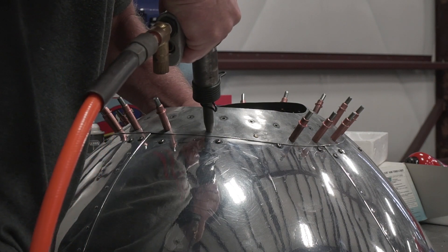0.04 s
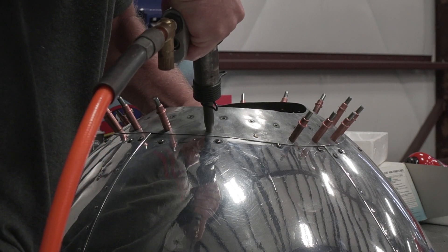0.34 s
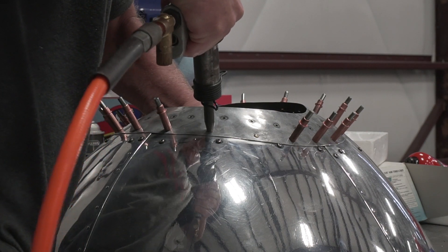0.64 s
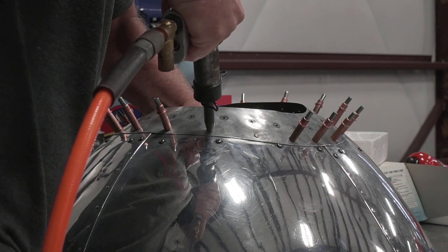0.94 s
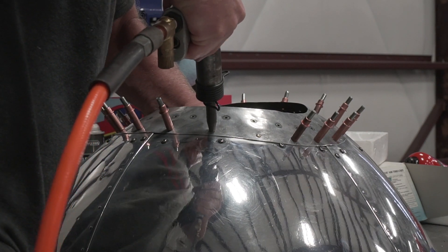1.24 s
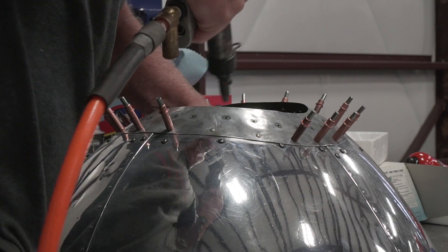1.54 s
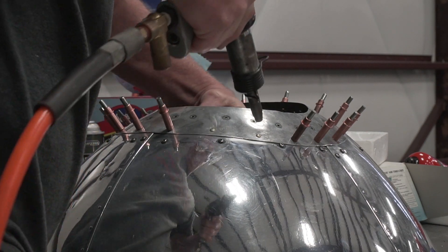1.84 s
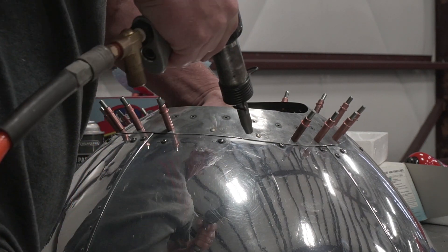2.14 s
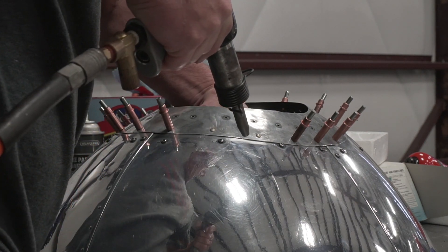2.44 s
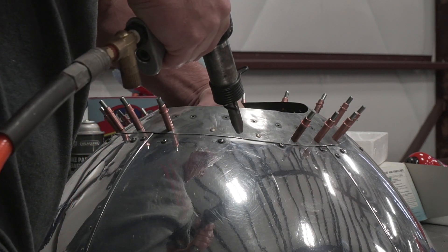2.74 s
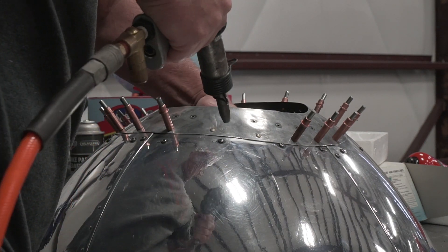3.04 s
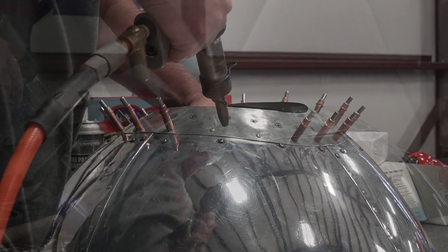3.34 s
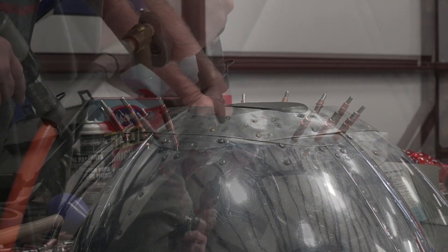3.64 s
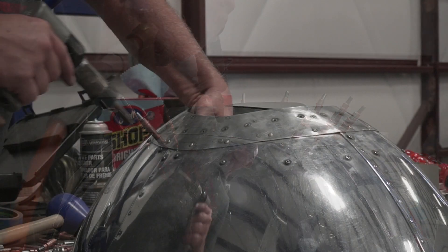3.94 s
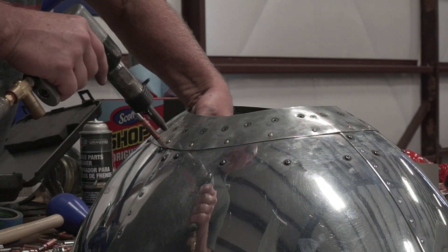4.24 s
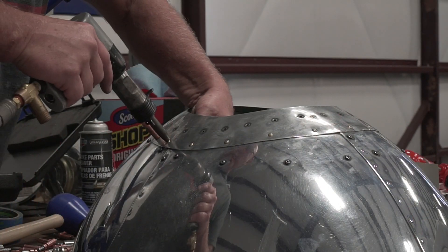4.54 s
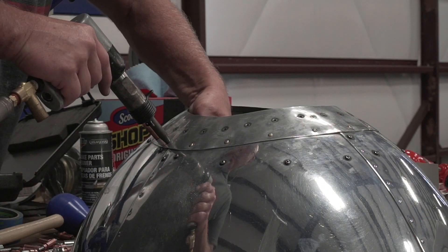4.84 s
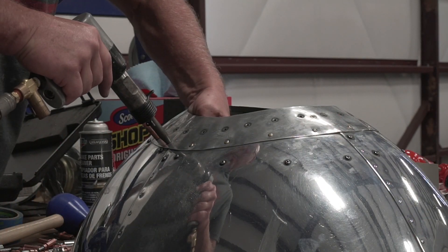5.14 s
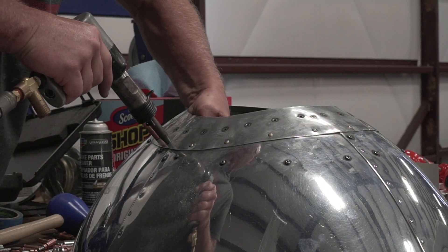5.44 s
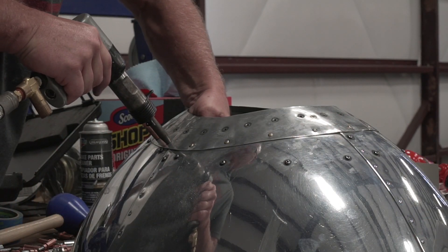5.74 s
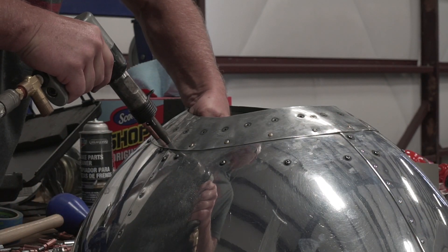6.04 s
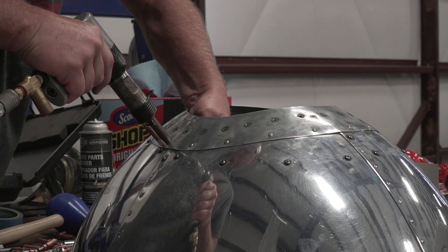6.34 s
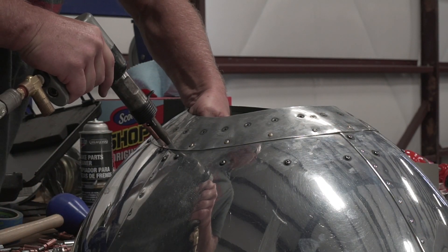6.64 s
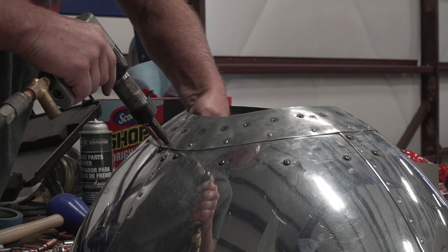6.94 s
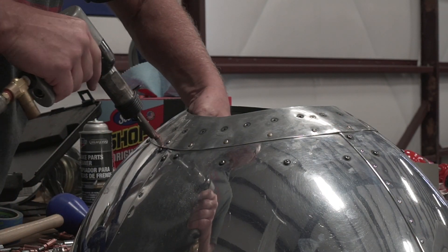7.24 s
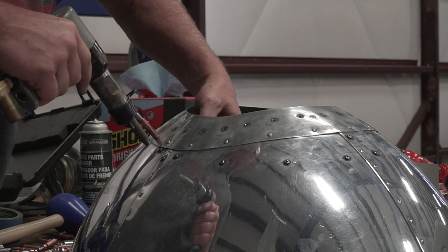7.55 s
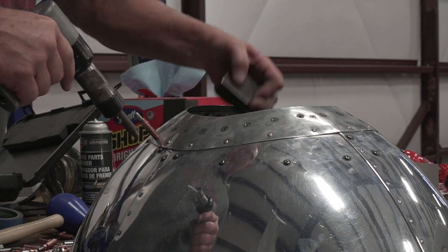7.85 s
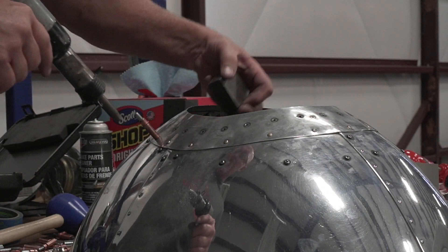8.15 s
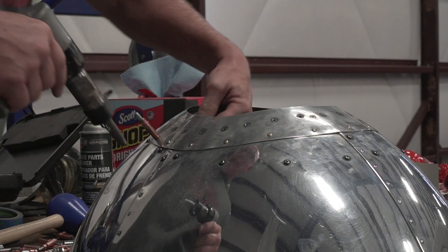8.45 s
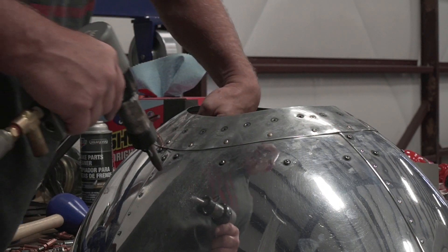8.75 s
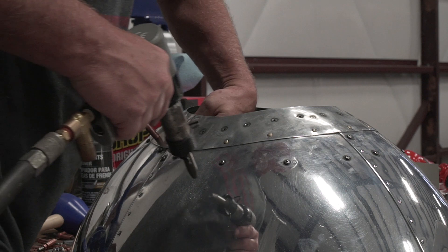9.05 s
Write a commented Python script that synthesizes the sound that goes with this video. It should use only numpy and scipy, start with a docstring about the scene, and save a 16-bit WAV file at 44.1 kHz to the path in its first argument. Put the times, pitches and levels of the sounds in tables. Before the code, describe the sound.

Rapid bursts of air-powered riveting ring on sheet metal in a reverberant workshop, separated by a pause with soft metallic knocks.

```python
"""A pneumatic rivet gun drives two rivets into a hollow sheet-metal shell in a large, hard-walled
workshop. Each piston blow is an impulse that cracks through the steel tool and excites the shell's
modes; the faster the piston runs, the harder it strikes. The trigger puffs air, and between rivets the
tool and the bucking bar knock on the metal. Behind them lie a hiss and a motor hum that dies away.
A close mono microphone ducks and overloads at the hard blows."""
import sys
import numpy as np
from scipy import signal
from scipy.fft import rfft, irfft
from scipy.io import wavfile
from scipy.ndimage import minimum_filter1d

SR = 44100
rng = np.random.default_rng(int(sys.argv[2]) if len(sys.argv) > 2 else 0)


def materialize(psi):
    """Save the field psi as 16-bit PCM at rate SR to the path in sys.argv[1].

    A 1-D psi becomes a single channel; in a 2-D psi each row is a channel.
    """
    bounded = np.clip(np.atleast_2d(psi).T, -1, 1)
    quanta = np.round(bounded * 32767).astype(np.int16)
    wavfile.write(sys.argv[1], SR, quanta)


N = 400428
LEAD = SR // 2  # samples before time zero, so that the room is already ringing


def amp(db):
    """Amplitude ratio of a level in decibels."""
    return 10 ** (np.asarray(db) / 20)


def unit_rms(x):
    """Normalisation of power to rms 1."""
    return x / np.sqrt(np.mean(x ** 2) + 1e-20)


def unit_energy(x):
    """Normalisation of a transient to the energy of 10 ms at rms 1."""
    return x * np.sqrt(SR / 100 / (np.sum(x ** 2) + 1e-20))


def read(points, hz, column=1):
    """Interpolation of a table column on a logarithmic frequency axis."""
    table = np.asarray(points, float)
    return np.interp(np.log(hz + 1), np.log(table[:, 0] + 1), table[:, column])


def add(mix, s, sound):
    """Superposition of a sound on the mix at time s."""
    part = mix[LEAD + round(s * SR):][:len(sound)]
    part += sound[:len(part)]


def coloured(x, spectrum, column=1, size=2048):
    """Minimum-phase filtering: the magnitude spectrum determines a causal response."""
    hz = abs(np.fft.fftfreq(size, 1 / SR))
    log_gain = np.log(amp(read(spectrum, hz, column)))
    taps = np.fft.ifft(np.exp(np.conj(signal.hilbert(log_gain)))).real
    return signal.fftconvolve(x, taps[:size // 2])[:len(x)]


def dying_noise(decay_times, count):
    """Modal overlap: dense modes merge into noise, each band decaying with its own T60."""
    hz, t, bands = signal.stft(rng.standard_normal(count), SR, nperseg=256)
    t60 = np.maximum(read(decay_times, hz), .01)[:, None]
    return signal.istft(bands * amp(-60 * t / t60), SR, nperseg=256)[1][:count]


def ring(t, hz, t60, db):
    """Free vibration of one damped mode; db sets its energy."""
    return amp(db - 60 * t / t60) / np.sqrt(t60) * np.sin(2 * np.pi * (hz * t + rng.random()))


def damped(t, modes):
    """Modal sum in which decay time is inversely proportional to bandwidth."""
    return unit_energy(sum(ring(t, hz, 2.2 / width, db) for hz, width, db in modes))


def scrape(t, decay_s):
    """Rough contact of metal on metal: exponentially decaying noise."""
    return rng.standard_normal(len(t)) * np.exp(-t / decay_s)


# Spectral density of the hiss: f/Hz, relative level/dB
HISS_SPECTRUM = [(12, -36), (20, -4), (27, -18), (60, -1.5), (123, -5.5), (150, 1), (177, -2.5),
                 (198, -4.5), (446, -10.5), (678, -7.5), (849, -10.5), (1220, -10), (5080, -15.5),
                 (8890, -27.5), (16000, -49.5)]


def hiss(level_db=-43, dip_s=3.7, dip_width_s=0.15, dip_db=-3, step_db=0.5):
    """Broadband noise whose level dips briefly and settles one small step higher, at level_db."""
    hz = np.fft.rfftfreq(N, 1 / SR)
    noise = irfft(rfft(rng.standard_normal(N)) * amp(read(HISS_SPECTRUM, hz)), N)
    u = (np.arange(N) / SR - dip_s) / dip_width_s
    envelope_db = level_db + dip_db * np.exp(-u ** 2 / 2) + step_db * (np.tanh(u) - 1) / 2
    return amp(envelope_db) * unit_rms(noise)


# Envelope of the motor hum: t/s, level/dB
HUM_ENVELOPE = [(0.0, -53), (0.1, -46), (1.13, -51), (1.37, -44), (1.92, -52), (2.29, -44), (3.18, -39.5),
                (3.69, -46.5), (3.9, -67)]
# Its harmonics: order, relative level/dB
HUM_HARMONICS = [(1, 4), (2, -14), (3, -22), (4, -12)]


def motor_hum(fundamental_hz=49.3, waver_rad=0.08, fade_db_per_s=80):
    """A harmonic series with slow random phase modulation, fading after the envelope's last point."""
    t, hz = np.arange(N) / SR, np.fft.rfftfreq(N, 1 / SR)
    hum = 0
    for order, db in HUM_HARMONICS:
        drift = unit_rms(irfft(rfft(rng.standard_normal(N)) * np.exp(-hz / 4), N))
        hum += amp(db) * np.sin(order * (2 * np.pi * fundamental_hz * t + waver_rad * drift))
    fade_db = fade_db_per_s * np.maximum(t - HUM_ENVELOPE[-1][0], 0)
    return amp(np.interp(t, *np.transpose(HUM_ENVELOPE)) - fade_db) * unit_rms(hum)


# Reverberation of the workshop: f/Hz, T60/s, level/dB
ROOM_BANDS = [(101, 2.3, -4.5), (183, 0.8, -14), (380, 0.71, -29), (1040, 0.69, -13), (2160, 1.26, -9.5),
              (4250, 1.73, -10), (7500, 1.63, -4.5), (11100, 0.95, -7), (15000, 0.59, -3.5)]


def workshop(x, build_s=0.0032, walls_s=0.033, walls_width_s=0.027, walls_db=1):
    """Reverberation: convolution with early reflections from the near walls and a diffuse tail."""
    t, hz = np.arange(2 * SR) / SR, np.fft.rfftfreq(2 * SR, 1 / SR)
    walls = amp(walls_db) * np.exp(-((t - walls_s) / walls_width_s) ** 2 / 2)
    tail = dying_noise(ROOM_BANDS, len(t)) * (1 + walls) * (1 - np.exp(-t / build_s))
    decay_energy = read(ROOM_BANDS, hz) * SR / (2 * np.log(1000))
    response = irfft(rfft(tail) * amp(read(ROOM_BANDS, hz, column=2)) / np.sqrt(decay_energy))
    return signal.fftconvolve(x, response)[:len(x)]


# Tool and bar set down on the shell: t/s, level/dB, thud f/Hz, hardness (0 to 1)
KNOCKS = [(2.204, -35.5, 225, 0.17), (2.354, -35, 233, 0.58), (2.39, -44, 400, 0.3), (3.188, -21, 427, .45),
          (3.201, -25.5, 420, 0.8), (3.52, -35, 298, 0.75), (3.839, -36, 330, .55), (4.619, -30, 427, 0.38),
          (4.733, -39.5, 375, 0.1), (4.917, -38.5, 350, 0.5), (6.883, -27.5, 450, .6),
          (7.238, -41, 377, .05), (7.256, -34, 360, 0.14)]
# Modes of the shell damped by the hand: f/Hz, bandwidth/Hz, level/dB
HELD_MODES = [(206, 42, 7.5), (273.5, 25, -1), (400, 12, -1), (501, 53, 2), (647, 130, 2)]
# Clack of the sheet: f/Hz, level/dB
CLACK_SPECTRUM = [(200, -0.5), (600, -1), (880, 0.5), (1130, 1), (1400, -4), (1800, -1), (2500, -8),
                  (4200, -14.5), (8000, -36.5)]
# Tick of the steel: f/Hz, level/dB
TICK_SPECTRUM = [(1000, -35), (3500, 8), (6500, -2.5), (10000, -6), (15000, -40)]


def knocks(clack_s=0.026, snap_s=0.00085, tick_s=0.018, rattle_db=-7, focus_db=7):
    """Light impacts: a harder contact is shorter, giving less thud and more clack and tick."""
    out, t = np.zeros(LEAD + N), np.arange(SR // 3) / SR
    soft_to_hard_db = (7, -7), (-5, 4), (-26, -9)
    for s, db, thud_hz, hardness in KNOCKS:
        thud_db, clack_db, tick_db = (db + np.interp(hardness, (0, 1), ends) for ends in soft_to_hard_db)
        contact_s = np.exp(np.interp(hardness, (0, 1), np.log((0.017, 0.0006))))
        onset = 1 - np.exp(-2 * t / contact_s)
        # the point of contact favours the modes near one frequency
        modes = [(hz, width, mode_db - focus_db * np.log2(hz / thud_hz) ** 2)
                 for hz, width, mode_db in HELD_MODES]
        thud = unit_energy(onset * damped(t, modes))
        clack = unit_energy(onset * coloured(scrape(t, clack_s), CLACK_SPECTRUM))
        contact = scrape(t, snap_s) + amp(rattle_db) * scrape(t, tick_s)
        tick = unit_energy(coloured(contact, TICK_SPECTRUM))
        add(out, s, amp(thud_db) * thud + amp(clack_db) * clack + amp(tick_db) * tick)
    return out


# Trigger pulls, each a puff of air and a tap of the piston: t/s, tap level/dB, puff level/dB
TRIGGER_PULLS = [(0.116, -27.5, -18), (0.9232, -30.5, -14), (0.9807, -23, -13), (6.1782, -23.5, -12),
                 (6.2366, -23.5, -15.5), (6.4671, -32, -13.5), (6.5226, -18.5, -15)]


def trigger_puffs(hz=340, glide=0.047, width_s=0.0011, before_tap_s=0.0017):
    """A Gaussian pressure pulse that rises in frequency as the valve opens."""
    out, t = np.zeros(LEAD + N), np.arange(-SR // 100, SR // 100) / SR
    u = t / width_s
    puff = -np.exp(-u ** 2 / 2) * np.sin(2 * np.pi * hz * t * (1 + glide * u))
    for s, _, db in TRIGGER_PULLS:
        add(out, s - before_tap_s + t[0], amp(db) * puff)
    return out


# Lone piston strokes: t/s, level/dB, coupling to the shell/dB
LONE_STROKES = [(-.11, -6, 1.5), (.0195, -11.5, -1), (.7943, -23, -6.5), (1.3167, -18, -14),
                (6.2606, -9, 0.5)]
# Hammering as the trigger is squeezed and released, one curve per burst: t/s, blow rate/Hz
BURST_RATES = [
    [(.1412, 15.36), (.276, 15.08), (.464, 17.02), (.586, 29.16), (.705, 7.75)],
    [(.9935, 28.56), (1.09, 34.31), (1.24, 6.1)],
    [(6.5366, 27.74), (6.574, 31.62), (6.665, 12.8)],
]


def piston_blows(full_rate_hz=30, full_rate_db=(-4.5, -4.5, 0), tap_coupling_db=0.5):
    """Momentum transfer: a faster stroke hits harder. Returns rows of t/s, level/dB, coupling/dB."""
    level_db_per_doubling, coupling_db_per_doubling = 4, 2
    rows = list(LONE_STROKES) + [(s, tap_db, tap_coupling_db) for s, tap_db, _ in TRIGGER_PULLS]
    for db, curve in zip(full_rate_db, BURST_RATES):
        t = np.arange(curve[0][0], curve[-1][0], 1 / SR)
        rate = np.interp(t, *np.transpose(curve))
        cycles = np.cumsum(rate) / SR
        times = np.interp(np.arange(int(cycles[-1]) + 1), cycles, t)  # one blow per cycle
        stroke_s = np.diff(times, prepend=times[0] - 1 / rate[0])
        doublings = -np.log2(stroke_s * full_rate_hz)
        rows += zip(times, db + level_db_per_doubling * doublings, coupling_db_per_doubling * doublings)
    return rows


# Modes of the steel tool: f/Hz, bandwidth/Hz, level/dB
TOOL_MODES = [(2750, 170, -6), (3130, 150, 1), (3350, 150, -1), (3950, 170, -1), (4570, 170, 0),
              (5080, 220, -4), (6200, 200, -12), (7070, 220, -6), (7950, 250, -10), (8550, 250, -9)]


def tool_ring(t, rivet, direct_db=(-1, -9), spread_db=(-4, -10)):
    """Heavily damped vibration of the tool on the rivet: direct sound and sound sent to the room."""
    tool = damped(t, TOOL_MODES)
    return amp(direct_db[rivet]) * tool, amp(spread_db[rivet]) * tool


# Crack on the direct path: f/Hz, level/dB at rivet 1, level/dB at rivet 2
CRACK_SPECTRUM = [(80, -22, -19), (201, -11.5, 6), (530, 7.5, 1), (1466, -26, -5), (2580, -1, 2.5),
                  (3400, 1, 0), (4600, 0, -7), (5950, -1.5, -13.5), (8270, 0.5, -5.5), (10900, -10, -20),
                  (12700, -5, -16), (15800, -10.5, -24)]
# Crack summed over all directions: f/Hz, level/dB at rivet 1, level/dB at rivet 2
SPREAD_SPECTRUM = [(100, -17, -21), (600, -4.5, 4.5), (1700, -5, 8.5), (3000, -4, 6), (4070, 0, 4.5),
                   (5300, -9, -3.5), (9000, -16, -9.5), (11000, -16.5, -13.5), (15000, -28, -27)]


def crack(t, rivet, blow_db, decay_s=0.0061, firm_db=-12.5, direct_db=(-3, -1), spread_db=(-1, 1)):
    """Impact noise: a direct crack, brighter with force, and a smooth-spectrum click sent to the room."""
    tilt_db = 4 * np.tanh((blow_db - firm_db) / 2)
    spectrum = [(hz, db[rivet] + tilt_db * np.log2(1 + hz / 4000)) for hz, *db in CRACK_SPECTRUM]
    noise = unit_energy(coloured(scrape(t, decay_s), spectrum))
    click = unit_energy(coloured(signal.unit_impulse(len(t)), SPREAD_SPECTRUM, rivet + 1))
    return amp(direct_db[rivet]) * noise, amp(spread_db[rivet]) * click


# Punch of the sheet under the rivet: f/Hz, level/dB
PUNCH_SPECTRUM = [(100, -24.5), (250, -3.5), (600, -14), (850, -10), (1080, -1), (1400, -0.5), (1800, -1.5),
                  (2500, -15.5), (6000, -26)]


def sheet_punch(t, rivet, drive_db, decay_s=0.002, exponent=2.1, level_db=(3, 1)):
    """Nonlinear contact: as the tool bears down, the local punch grows faster than the ring."""
    punch = unit_energy(coloured(scrape(t, decay_s), PUNCH_SPECTRUM))
    return amp(level_db[rivet] + exponent * drive_db) * punch


# Distinct modes of the shell: f/Hz, T60/s, level/dB at rivet 1, level/dB at rivet 2
SHELL_MODES = [(167, 0.9, -29, -14), (205, 0.18, -9, -3), (248, 0.18, -7, -9), (280, 0.18, -10, -3),
               (393, 0.24, -3, -10), (441, 0.18, -18, -8), (635, 0.18, -5, -9), (829, 0.18, -7, -13),
               (942, 0.18, -11, -1), (991, 0.18, -3, -10), (1012, 1.8, -29, -17), (1071, 0.18, -2, -10),
               (1125, 0.18, -5, -3), (1292, 0.15, -7, -17), (1416, 0.15, -5, -7), (1550, 0.15, -7, -17),
               (1615, 0.15, -13, -2), (1739, 0.13, -7, -6), (1960, 0.13, -12, -3), (2159, 0.15, -21, -4),
               (2396, 0.1, -6, -11), (2492, 0.1, -13, -6), (2719, 0.1, -7, -17), (2815, 0.1, -8, -21),
               (3036, 0.1, -14, -9), (3262, 0.1, -8, -22), (3375, 0.1, -12, -11), (3989, 0.1, -10, -27),
               (4597, 0.1, -11, -28), (5206, 0.1, -14, -21)]
# Wash of its dense, weaker modes: f/Hz, level/dB at rivet 1, level/dB at rivet 2
WASH_SPECTRUM = [(50, -44, -38), (104, -4, 2.5), (184, -3, -11), (302, -3.5, -1), (497, 0.5, 3.5),
                 (690, -2, -3), (1090, -4, 3), (1930, -2, 2), (2590, 1.5, -2.5), (4140, -21.5, -20),
                 (8200, -14.5, -16), (17300, -57, -9)]
# Decay of the wash: f/Hz, T60/s
WASH_DECAY = [(150, 0.11), (1000, 0.34), (3000, 0.2), (10000, 0.028)]


def shell_ring(t, rivet, detune=0.012, scatter_db=2, build_s=0.0034, modes_db=(-2, -3), wash_db=-2):
    """Modal response of the shell, building up as bending waves travel round it."""
    # the pressure of tool and bar shifts the modes that they damp, differently at each blow
    chance = rng.standard_normal((len(SHELL_MODES), 2))
    modes = sum(ring(t, hz * (1 + detune * shift * np.exp(-2 * t60)), t60, db[rivet] + scatter_db * size)
                for (hz, t60, *db), (shift, size) in zip(SHELL_MODES, chance))
    modes = unit_energy(modes * (1 - np.exp(-t / build_s)))
    wash = unit_energy(coloured(dying_noise(WASH_DECAY, len(t)), WASH_SPECTRUM, rivet + 1))
    return amp(modes_db[rivet]) * modes + amp(wash_db) * wash


def rivet_gun(second_rivet_s=4, shell_spread_db=-1):
    """Impulsive excitation of tool and shell: the direct sound and what spreads into the room."""
    direct, spread = np.zeros((2, LEAD + N))
    t, brief_t = np.arange(SR) / SR, np.arange(SR // 10) / SR
    for s, blow_db, coupling_db in piston_blows():
        rivet = int(s > second_rivet_s)  # selects from each pair of levels
        drive_db = blow_db + coupling_db
        tool_direct, tool_spread = tool_ring(brief_t, rivet)
        crack_direct, crack_spread = crack(brief_t, rivet, blow_db)
        shell = amp(drive_db) * shell_ring(t, rivet)
        add(direct, s, shell + sheet_punch(t, rivet, drive_db))
        add(direct, s, amp(blow_db) * (tool_direct + crack_direct))
        add(spread, s, amp(shell_spread_db) * shell)
        add(spread, s, amp(blow_db) * (tool_spread + crack_spread))
    return direct, spread


def scene(knock_room_db=-5, puff_room_db=-14):
    """Superposition of direct sound, reverberant field and background, alike in both channels."""
    gun, spread = rivet_gun()
    puffs, handling = trigger_puffs(), knocks()
    room = workshop(spread + amp(puff_room_db) * puffs + amp(knock_room_db) * handling)
    mono = (gun + puffs + handling + room)[LEAD:] + hiss() + motor_hum()
    return np.array([mono, mono])


def record(dry, threshold_db=-10, slope=0.85, sense_s=0.0058, attack_s=0.00022, hold_s=0.015,
           recovery_db_per_s=200, cutoff_hz=16150):
    """Compression: the gain ducks too late for the crack, which clips; a low-pass limits the band."""
    def lag(x, seconds):
        pole = np.exp(-1 / (seconds * SR))
        return signal.lfilter([1 - pole], [1, -pole], x)
    level_db = 10 * np.log10(lag(dry[0] ** 2, sense_s) + 1e-12)
    reduction_db = slope * np.maximum(level_db - threshold_db, 0)
    half_hold = int(hold_s * SR / 2)
    held_db = -minimum_filter1d(-reduction_db, 2 * half_hold + 1, origin=half_hold)
    recovery_db = np.arange(N) * recovery_db_per_s / SR  # as the gain returns, the room swells up
    duck_db = lag(np.maximum.accumulate(held_db + recovery_db) - recovery_db, attack_s)
    clipped = np.clip(dry * amp(-duck_db), -1, 1)
    low_pass = signal.firwin(255, cutoff_hz, window=("kaiser", 7), fs=SR)
    return signal.oaconvolve(clipped, low_pass[None], "same", axes=1)


dry = scene()
out = record(dry)
materialize(out)
```